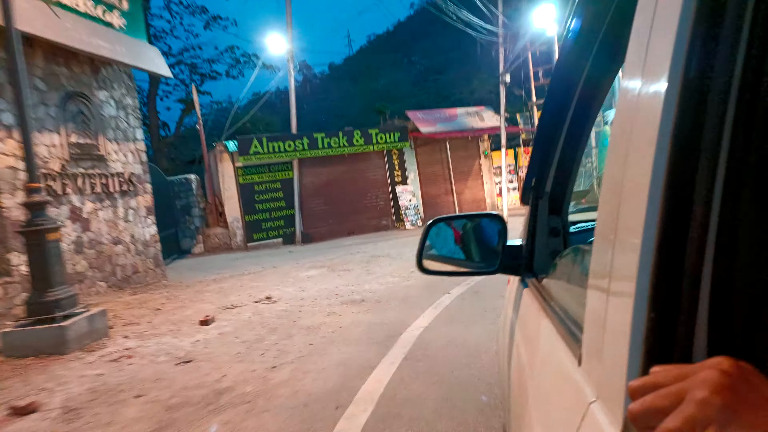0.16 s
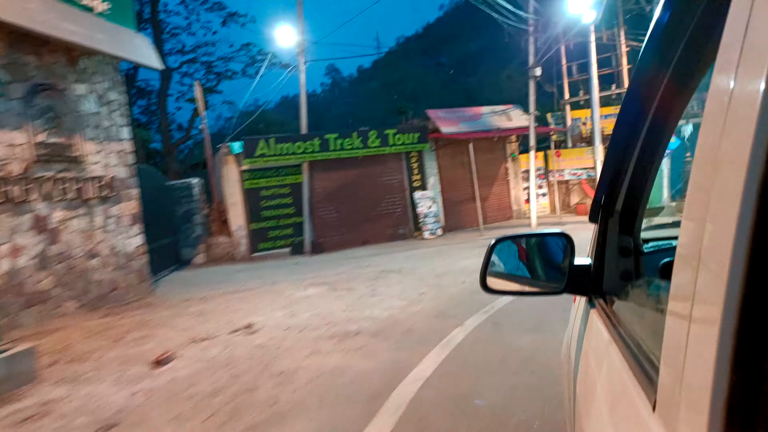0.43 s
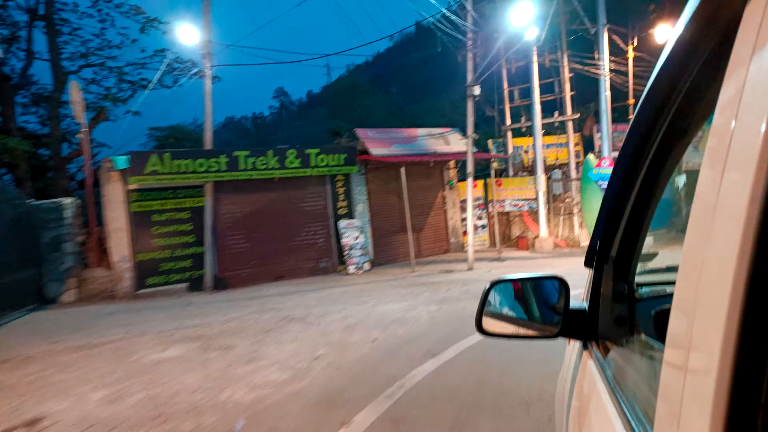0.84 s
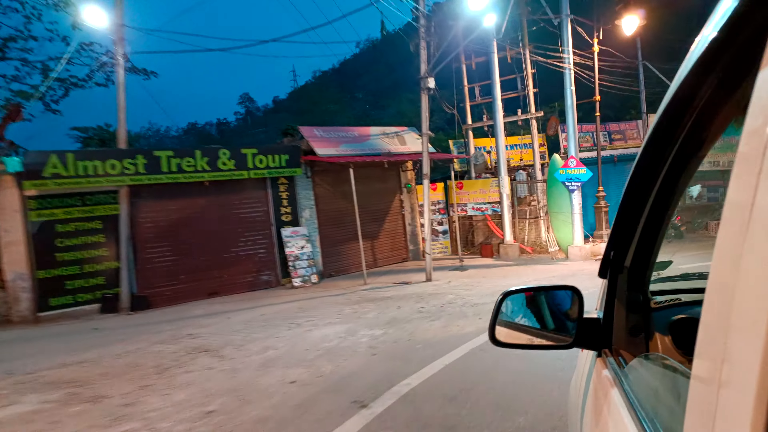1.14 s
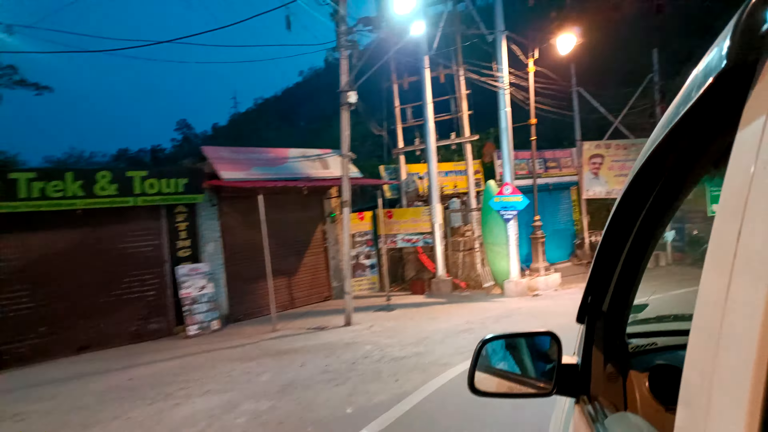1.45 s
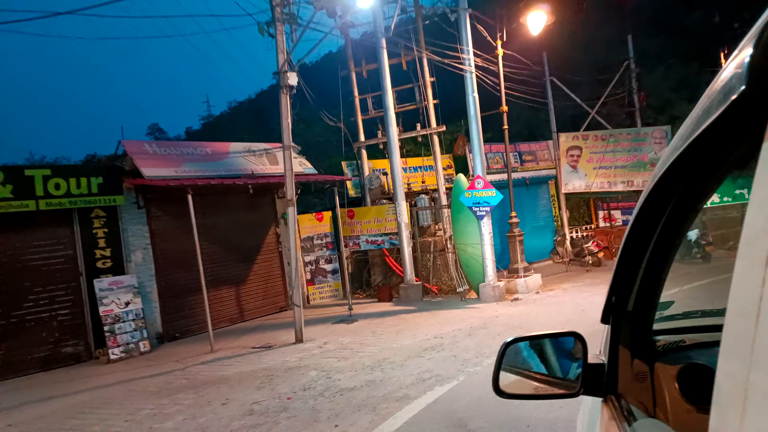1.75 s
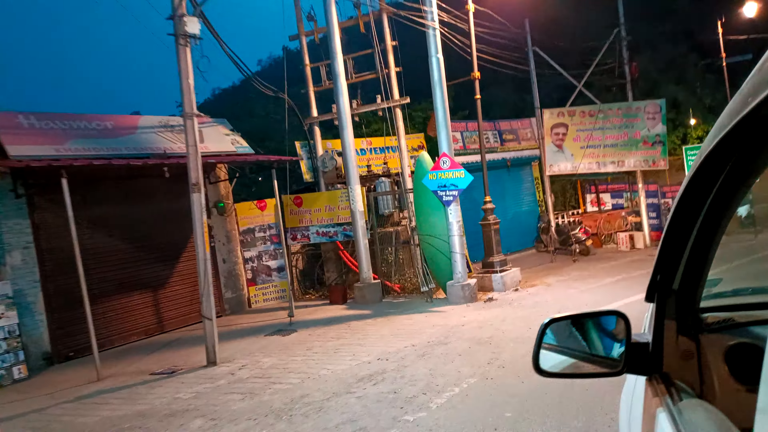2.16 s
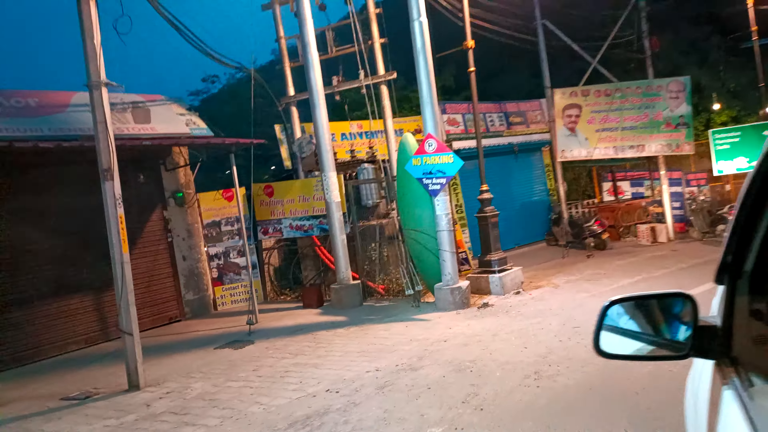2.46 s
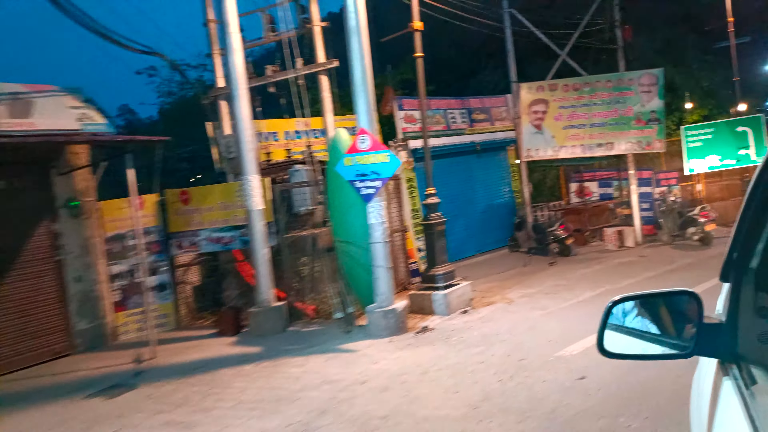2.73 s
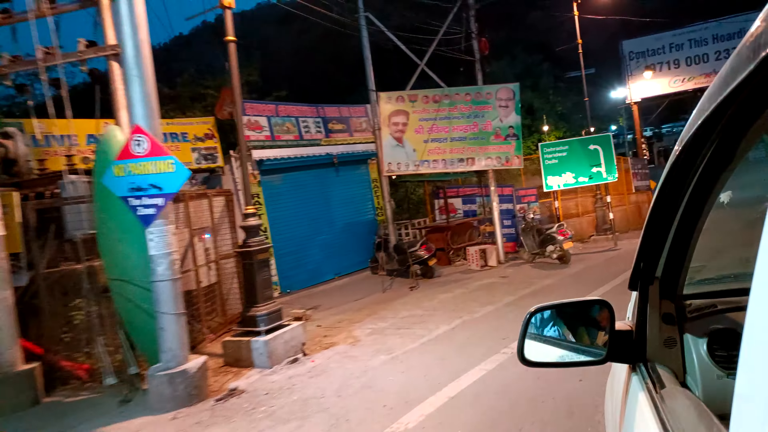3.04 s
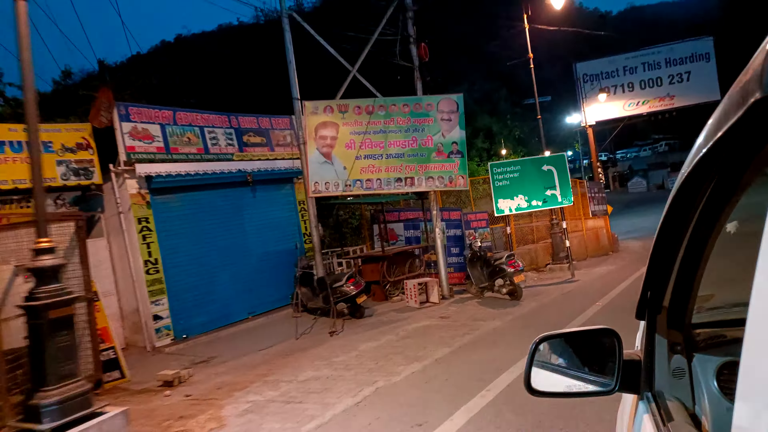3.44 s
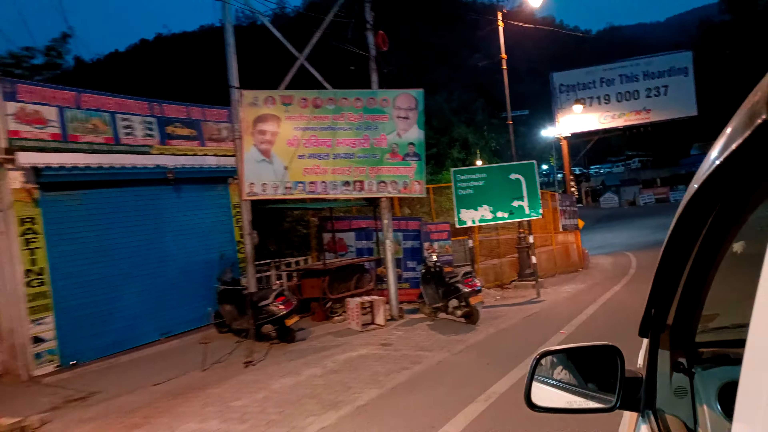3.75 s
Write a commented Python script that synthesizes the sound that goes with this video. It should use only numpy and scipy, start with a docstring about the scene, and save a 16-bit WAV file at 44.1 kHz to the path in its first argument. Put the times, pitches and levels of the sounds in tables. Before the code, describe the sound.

A car rolls slowly along a street, heard from a microphone at its open side window. The engine drones and knocks at low revs while tyres hiss and gusts of wind thump on the microphone, strongest on the left. About halfway through the engine eases and sinks towards idle, the wind turns louder, with choppy, crackling buffets, and a loose part ticks and rattles lightly on the right.

```python
"""Slow drive, window open

A street, heard from a phone held at the open side window of a slowly rolling car.
Close by, the engine drones and knocks at low revs and sags as the car slows, shaking a loose part.
Wind buffets the two microphone ports, the outer (left) one hardest, and drives the phone's limiter.
Behind it all, tyres and passing air hiss."""
import sys
import numpy as np
from scipy import signal
from scipy.fft import rfft, irfft
from scipy.io import wavfile
from scipy.ndimage import uniform_filter1d, minimum_filter1d, map_coordinates

SR = 44100
rng = np.random.default_rng(int(sys.argv[2]) if len(sys.argv) > 2 else 0)


def transcribe(signal):
    """Save signal, clipped to [-1, 1], as a 16-bit WAV file at the path in sys.argv[1]."""
    frames = np.atleast_2d(signal).T
    limited = np.clip(frames, -1, 1)
    pcm = np.round(limited * 32767).astype(np.int16)
    wavfile.write(sys.argv[1], SR, pcm)


N = 273420
T = np.arange(N) / SR

# engine speed: (time [s], firing rate [Hz])
FIRING_RATE = [(0.0, 30.35), (0.19, 30.9), (0.34, 31.8), (0.74, 30.99), (0.9, 32.75), (1.26, 32.02),
               (1.36, 32.94), (1.6, 32.32), (2.68, 35.64), (3.3, 27.42), (3.57, 26.91), (4.13, 26.81),
               (5.59, 23.42), (5.84, 22.59), (6.06, 22.83), (6.2, 21.4)]
# mean wind at the window: (time [s], rumble level [dB], tearing level [dB])
MEAN_WIND = [(0, -19, -34.5), (1.2, -23.5, -35), (2.8, -23, -34), (3.4, -13.5, -24.5), (4.1, -18, -23),
             (5.5, -15, -24), (5.8, -15.5, -27), (6.2, -13.5, -22.5)]


def engine(knock_s=0.026, left_db=-1, right_lag_s=0.0005):
    """Each firing thumps the exhaust and the cabin, knocks in the block and shakes a loose part."""
    # how hard the engine labours: (time [s], load [dB])
    effort = [(0, -1.5), (1.5, -3), (2.6, -3), (3.4, 1.5), (4.2, 3.5), (5, 5), (5.7, 0), (6.2, 0.5)]
    # resonances of exhaust and block: (frequency [Hz], gain [dB])
    exhaust_shape = [(8,-36),(30,-4.5),(68,0.5),(105,3),(135,-24),(165,6.5),(200,-8.5),(240,3),(290,-8.5),(370,0),(440,-4),(520,-15),(820,-29.5),(5000,-100)]
    block_shape = [(20,-48),(150,-26),(300,-19),(400,2.5),(510,-8.5),(650,-2),(830,-4.5),(1050,-17),(1350,-13.5),(1800,-26),(2600,-26.5),(4500,-43),(14000,-60)]
    hz, = curves(FIRING_RATE)
    load, = curves(effort)
    pace_db = 20 * np.log10(hz / 30)  # relative to cruising
    throttle_lift = arches([(2.93, 0.33, -18)])
    pulses, age, strength = firings(hz)
    exhaust = colour(pulses, exhaust_shape) * undb(-19 + 0.86 * load + throttle_lift)
    thud = cabin_resonances(body_echoes(exhaust + cabin(pulses, load, pace_db) + drone(pulses)))
    strikes = strength * np.exp(-age / knock_s) + gear_clatter(age, hz)
    # part of the knock reaches both ports directly, more is scattered by the road and walls
    direct = noise()
    knock = np.array([colour(strikes * (direct + 3.4 * noise()), block_shape) for _ in range(2)])
    knock *= undb(-29 + 3.4 * pace_db + 0.18 * load + throttle_lift)
    left, right = thud + knock + loose_ticks(age, hz)
    return np.array([left * undb(left_db), np.interp(T - right_lag_s, T, right)])


def firings(hz, scatter_db=1):
    """Four cylinders fire a little unevenly: pulses, seconds since the last one, and its strength."""
    # the cylinders in firing order: (strength [dB])
    cylinders = [0.037, 0.2, 0.17, -0.38]
    cycles = 0.3715 + np.cumsum(hz) / SR + 0.004 * walk(25)
    count = cycles.astype(int)
    strength = undb(np.take(cylinders, count, mode="wrap") + scatter_db * noise()[count])
    pulses = np.diff(count, prepend=count[0]) * strength
    return pulses, cycles % 1 / hz, strength


def cabin(pulses, load, pace_db, lag_s=0.0062, wobble_s=0.0003):
    """The cabin hums just after each firing, wavering, and booms lower down as the engine labours."""
    # the broad boom and the narrow hum: (frequency [Hz], gain [dB])
    boom_shape = [(8,-102),(50,-28.5),(76,-17),(100,7),(128,3),(160,4),(220,-15),(400,-47),(4000,-110)]
    hum_shape = [(8,-80),(110,-30.5),(148,0),(164,-2.5),(183,-13.5),(204,1),(220,-2.5),(240,-8),(262,-11.5),(295,-20),(4000,-110)]
    # moments when the hum seems to sink under the wind: (time [s])
    sinking_moments = [1.15, 1.38, 1.852, 2.13]
    late_pulses = np.interp(T - lag_s - wobble_s * walk(14), T, pulses, left=0)
    boom_db = -21 + 2.17 * load + 2 * walk(5.03)
    hum_db = -24 + 0.98 * load + 0.76 * pace_db + 3 * walk(8.8)
    hum_db += arches([(s, 0.15, -22) for s in sinking_moments])
    return colour(pulses, boom_shape) * undb(boom_db) + colour(late_pulses, hum_shape) * undb(hum_db)


def drone(pulses, waver_db=2):
    """Overtones of the firing ring in the car's body while the engine revs up."""
    # swell of the drone: (time [s], level [dB])
    swell = [(0, -48), (1.1, -53), (1.3, -31), (2.0, -27), (2.65, -30), (2.9, -27.5), (3.3, -42),
             (3.7, -49)]
    # body resonances: (frequency [Hz], gain [dB])
    body_shape = [(8, -67), (45, -21), (70, 3), (85, -11), (106, 3.5), (130, -28), (205, -28), (240, 2),
                  (264, -1), (295, -26), (370, -25.5), (430, 0), (495, -13), (560, -30), (655, -6),
                  (780, -25), (4000, -100)]
    level, = curves(swell)
    return colour(pulses, body_shape) * undb(level + waver_db * walk(5.13))


def body_echoes(thud, feedback=0.55, lead_s=0.0042):
    """Short echoes in the body smear each thud, which starts just before the block knocks."""
    for echo_s in (0.0019, 0.0033):
        allpass = np.r_[-feedback, np.zeros(int(echo_s * SR)), 1]
        thud = signal.lfilter(allpass, allpass[::-1], thud)
    return np.interp(T + lead_s, T, thud)


def cabin_resonances(thud, width_hz=22):
    """Single overtones of the firing stand out or sink for a moment in the cabin."""
    # narrow swells and dips: (crest time [s], length [s], frequency [Hz], gain [dB])
    overtones = [(2.35, 1.194, 207, 4.5), (3.9, 1.0, 160, 6), (4.256, .6, 127.9, -8.5),
                 (5.201, 1.07, 123, 5)]
    return thud + sum(resonate(thud, hz, width_hz) * (undb(arches([(s, length_s, db)])) - 1)
                      for s, length_s, hz, db in overtones)


def gear_clatter(age, hz, below_hz=23.3, gain_db=4, decay_s=0.003):
    """Force of the slack gears, which strike three times per firing as the engine nears idle."""
    # gear strikes: (position [share of the firing cycle], level [dB])
    strikes = [(.11, -12), (.45, -9), (.79, -6)]
    slack = (1 + np.tanh(2 * (below_hz - hz))) / 2
    return slack * sum(undb(db + gain_db) * np.exp(-((age * hz - share) % 1) / hz / decay_s)
                       for share, db in strikes)


def loose_ticks(age, hz, below_hz=26.8, range_hz=0.7, shake_s=0.0045, left_db=-7):
    """At low revs a loose part ticks unevenly with each firing, and once rattles hard."""
    # ring of the part: (frequency [Hz], gain [dB])
    part_shape = [(200,-31),(1800,-26),(2700,6.5),(3600,1),(4300,5.5),(4800,-4),(5400,2),(6150,0),(7300,-17),(14000,-18)]
    looseness = (1 + np.tanh((below_hz - hz) / range_hz)) / 2
    hard_rattle = arches([(4.993, 0.78, 6)])
    shake = (0.5 + age / shake_s * np.exp(1 - age / shake_s)) * undb(2 * walk(35))
    ticks = np.array([colour(shake * noise(), part_shape) for _ in range(2)])
    return ticks * looseness * undb(-42 + hard_rattle) * undb([[left_db], [0]])


def loose_clacks(gain_db=5, crack_s=0.0015, tail_s=0.013, tail_db=-11, click_db=-10, left_db=-10):
    """The loose part strikes, to the right: a dry click with a short ring, pitched anew each time."""
    # separate knocks: (time [s], level [dB], ring frequency [Hz])
    knocks = [(2.625, -26, 4500), (2.685, -31, 4990), (3.871, -32, 4170), (4.02, -27, 3580),
              (4.401, -32, 5040), (4.935, -27, 5234), (4.944, -29, 5564), (5.024, -23.5, 4420),
              (5.066, -26.5, 5045), (5.107, -28, 3960), (5.189, -23.5, 3930), (5.526, -29.5, 5940),
              (5.827, -31, 3504), (5.917, -31, 4243), (6.128, -30, 2500), (6.139, -31, 5824)]
    out, age = np.zeros((2, N)), T[:SR // 25]
    envelope = age / crack_s * np.exp(1 - age / crack_s) + undb(tail_db) * np.exp(-age / tail_s)
    for s, db, hz in knocks:
        burst = rng.standard_normal((2, len(age))) * envelope * undb(db + gain_db)
        clack = resonate(burst, hz, width_hz=1400) + undb(click_db) * burst
        start = int(s * SR)
        out[:, start:start + len(age)] += clack[:, :N - start]
    band = signal.butter(5, [2400, 6600], "bandpass", fs=SR, output="sos")
    return signal.sosfilt(band, out) * undb([[left_db], [0]])


def outer_wind(rumble_db=5.5, lull_db=-12, swirl_db=2, surge_db=3):
    """Eddies rumble right on the outer port; in a surge they sweep past faster, louder and brighter."""
    # gusts over the mean wind: (crest time [s], length [s], rumble gain [dB], tearing gain [dB])
    gusts = [(.46, 0.11, 2.1, 3.3), (.59, .26, 7.8, 14.2), (.875, .1, 8.6, 17), (1.05, 0.23, 4, 9.4),
             (1.31, 0.12, 3.8, 7.9), (1.459, 0.076, 3.8, 1.4), (1.572, .084, 5.7, 7.1), (1.9, .13, 3.5, 6),
             (2.23, 0.077, 4.2, 2.8), (2.43, 0.19, 8, 6.9), (2.59, 0.21, 5.2, 7), (2.909, .12, 7.6, 5.06),
             (3.25, 0.1191, 3.4, 3.77), (3.39, 0.093, 10, 1.86), (3.531, 0.13, 2.55, 4.1),
             (3.62, 0.096, 7, 2.03), (5.3, 0.094, 3.67, 1.9), (5.559, 0.16, 3.5, 2.62)]
    # the air briefly leaves the port: (time [s], length [s])
    lulls = [(2.135, .11), (2.825, .11), (3.013, 0.17), (3.311, 0.054), (3.437, 0.058), (3.553, 0.055),
             (3.688, 0.061), (3.857, 0.049), (4.084, 0.056), (4.496, 0.061), (4.625, 0.11), (4.779, 0.0954),
             (4.893, 0.037), (5.05, 0.086), (5.172, 0.04), (5.457, 0.064), (5.863, 0.058)]
    # spectra of large and small eddies: (frequency [Hz], level [dB])
    rumble_shape = [(8,-22),(30,-12),(65,-4.5),(120,-2),(200,-6),(320,-9),(500,-17),(900,-35.5),(2000,-62.5),(10000,-110)]
    tearing_shape = [(20,3),(100,-29),(200,-1.5),(350,-3.5),(560,-2),(760,-8.5),(1050,-20),(1600,-31.5),(3500,-73),(10000,-100)]
    rumble_level, tearing_level = curves(MEAN_WIND)
    calm = arches([(s, length_s, lull_db) for s, length_s in lulls])
    rumble_level += calm + arches([(s, length_s, db) for s, length_s, db, _ in gusts])
    tearing_level += calm + arches([(s, length_s, db) for s, length_s, _, db in gusts])
    rumble = colour(noise() * undb(swirl_db * walk(35)), rumble_shape)
    rumble *= undb(rumble_level + rumble_db + walk(16))
    surge = unit(walk(90) + walk(260))
    force = undb(tearing_level + surge_db * surge) + buffets()
    speed = (force / undb(-18)) ** 0.1 * undb(surge)
    return rumble + sweep_past(colour(noise(), tearing_shape), speed) * force


def buffets(gain_db=-1, flutter_db=2.2, rise_s=0.003003, fall_s=0.004, end_share=0.65):
    """Force of air slapping the outer port: it strikes abruptly, flutters as it holds, and drops away."""
    # surges of air: (start [s], length [s], level [dB])
    surges = [(2.879, 0.019, -9), (2.917, 0.0096, -9), (3.104, 0.037, -15.5), (3.225, 0.029, -11.5),
              (3.261, 0.04, -10.5), (3.376, 0.022, -13.5), (3.507, 0.041, -5.5), (3.581, 0.042, -12),
              (3.648, 0.023, -11), (3.716, 0.02, -8), (3.878, 0.038, -12), (3.93, 0.031, -12.5),
              (3.988, 0.021, -14.5), (4.02, 0.047, -9.5), (4.099, 0.046, -9), (4.17, 0.023, -8),
              (4.235, .02, -6.5), (4.267, 0.051, -9), (4.351, 0.048, -9), (4.413, 0.029, -6.5),
              (4.467, 0.015, -9.5), (4.522, 0.049, -7.5), (4.583, 0.012, -8.5), (4.663, 0.053, -10),
              (4.722, 0.027, -12), (4.809, 0.027, -7.5), (4.849, 0.033, -9), (4.908, 0.02, -10.5),
              (4.94, 0.02038, -7.5), (4.975, 0.055, -7.5), (5.086, 0.065, -10.5), (5.179, 0.018, -12),
              (5.222, 0.035, -13), (5.292, 0.031, -14.5), (5.332, 0.044, -10), (5.39, 0.033, -12.5),
              (5.482, 0.02, -12.5), (5.513, 0.068, -8), (5.616, 0.032, -15), (5.974, 0.019, -8.5),
              (6.022, 0.043, -15), (6.085, 0.046, -14), (6.158, 0.035, -4.5)]
    force = np.zeros(N)
    for s, length_s, db in surges:
        corners = [s, s + rise_s, s + length_s, s + length_s + fall_s]
        force += undb(db) * np.interp(T, corners, [0, 1, end_share, 0])
    return force * undb(gain_db + flutter_db * walk(120))


def rasps(crackle_db=10, steady_s=0.006):
    """Fast eddies cross the outer port: quick swells of crackling air, brighter the faster they pass."""
    # sharp eddies: (time [s], peak [dB], rise time [s], speed [ratio])
    eddies = [(2.888, -23, .002, 0.54), (3.11, -15, 0.0026, 0.69), (3.232, -18, .002, .9),
              (3.25, -12, 0.0015, 0.86), (3.518, -8, 0.003, 0.63), (3.534, -16, 0.0031, 0.64),
              (4.111, -11, 0.0023, 0.75), (4.14, 0, 0.0029, 0.73), (4.17, -9, 0.0022, 1.07),
              (4.18, -13, 0.0023, 1.23), (4.29, -13, 0.0029, 0.91), (4.312, -5, 0.0012, 1.15),
              (4.364, -5, 0.0014, 1.09), (4.427, -4.5, 0.0023, 0.9), (4.473, -14.5, .002, 0.95),
              (4.549, -3.5, 0.0017, 0.65), (4.558, -7, 0.0023, 0.85), (4.701, -15, 0.0017, 0.93),
              (4.712, -16.5, 0.0014, 0.91), (4.819, -8.5, 0.0019, 0.91), (4.833, -21, 0.0023, .85),
              (4.946, -9, 0.0018, 1.0), (4.977, -12, 0.0022, 0.91), (5.002, -3, 0.0025, .9),
              (5.095, -20, 0.0018, 1), (5.107, -11, .0015, .9), (5.116, -10, 0.0016, 0.79),
              (5.257, -14.5, 0.002, 1.21), (5.334, -16, 0.0022, 0.83), (5.353, -15, 0.0021, 1.12),
              (5.364, -6, 0.0019, 0.96), (5.54, -12.5, 0.0015, 0.91), (5.555, -7, 0.0034, 1.38),
              (6.092, -17, 0.0016, 0.79), (6.131, -11, 0.0022, 0.92)]
    # their spectrum at speed 1: (frequency [Hz], level [dB])
    rasp_shape = [(20,-18),(250,-23),(700,11.5),(1400,-1.5),(1900,-4),(2800,-3.5),(4100,-25),(6000,-36),(15000,-49)]
    speed, = curves([(s, pace) for s, _, _, pace in eddies])
    crackle = colour(noise() * undb(crackle_db * walk(500)), rasp_shape)
    air = sweep_past(crackle, speed)
    running_rms = np.sqrt(uniform_filter1d(air ** 2, int(steady_s * SR)) + 1e-9)
    return air / running_rms * swells([row[:3] for row in eddies])


def thumps(gain_db=-3, wander=0.35):
    """Each slow eddy pushes and pulls on one port for a few uneven cycles."""
    # slow eddies: (crest time [s], level [dB], length [s], pitch [Hz], port [0 outer, 1 sheltered])
    eddies = [(0.062, -10, 0.038, 125, 1), (0.147, -6, 0.027, 126, 1), (0.179, 1, 0.046, 136, 0),
              (0.319, -1.5, 0.026, 148, 0), (0.412, -5, 0.033, 102, 1), (0.428, -1.5, 0.049, 131, 0),
              (0.475, 1, 0.017, 106, 0), (0.527, -8, 0.028, 97, 0), (0.858, -2, 0.035, 123, 0),
              (0.915, -6, 0.018, 97, 1), (0.947, -3, 0.03, 114, 0), (0.977, -8, 0.025, 113, 1),
              (1.016, -2, 0.055, 165, 0), (1.082, -5.5, 0.039, 111, 0), (1.315, -1, 0.021, 129, 0),
              (1.447, -6, 0.049, 115, 1), (1.545, -3, 0.033, 170, 0), (2.056, -8, 0.024, 122, 0),
              (2.42, -6, 0.05, 94, 0), (2.624, -6, 0.048, 104, 0), (2.895, -3.5, 0.048, 109, 0),
              (2.932, -1, 0.05, 118, 0), (3.14, -7, 0.039, 128, 0), (3.254, -7, 0.061, 95, 0),
              (3.349, -17, 0.055, 121, 1), (4.23, -17, 0.075, 105, 1), (4.375, -8, 0.049, 123, 1),
              (4.458, -11, 0.075, 81, 1), (5.375, -11, 0.063, 88, 1), (5.576, -7, 0.069, 148, 1),
              (5.634, -6, 0.051, 134, 1), (6.103, -2, 0.041, 104, 1)]
    out = np.zeros((2, N))
    uneven_time = np.cumsum(np.exp(wander * walk(170) - wander ** 2)) / SR
    for s, db, length_s, hz, port in eddies:
        near = np.abs(T - s) < 2 * length_s
        envelope = undb(db + gain_db) * np.exp(-(2 * (T[near] - s) / length_s) ** 2)
        out[int(port), near] += envelope * np.sin(2 * np.pi * hz * uneven_time[near])
    return out


def sheltered_wind(shelter_db=-6, flutter_db=2):
    """The sheltered port catches only a weak share of the wind, with dull puffs and a few slaps."""
    # puffs over the mean wind: (crest time [s], length [s], gain [dB])
    puffs = [(.08, 0.089, 15.5), (.42, 0.13, 11), (.93, .19, 15), (1.5, 0.32, 12.5), (2.06, .12, 9.5),
             (2.63, 0.17, 16), (4.98, 0.094, 15), (5.62, .2, 10), (5.8, .1, 8), (6.1, .15, 8)]
    # slaps of air: (time [s], peak [dB], rise time [s])
    slaps = [(5.245, -18, .004), (5.585, -6, .003), (5.632, -9, 0.0053), (5.81, -12.5, .0025)]
    # their spectra: (frequency [Hz], level [dB])
    puff_shape = [(8,-14),(25,-10.5),(80,-3.5),(140,-7),(250,-15.5),(450,-23),(1000,-45),(10000,-110)]
    slap_shape = [(20, -26), (150, -8), (330, 0), (600, -11), (1000, -25), (1600, -29), (3000, -43),
                  (10000, -86)]
    level, _ = curves(MEAN_WIND)
    level += shelter_db + arches(puffs) + flutter_db * walk(10)
    return colour(noise(), puff_shape) * undb(level) + colour(noise(), slap_shape) * swells(slaps)


def road_hiss(left_db=12, right_db=13.5, grit_db=2, flicker_db=0.72):
    """Below the window, tyres hiss over a gritty surface; each port colours the hiss in its own way."""
    # tyres and passing air, fading as the car slows: (time [s], level [dB])
    hiss_level = [(0.0, -37.5), (1.05, -37.5), (2.19, -35), (2.54, -36.5), (3.2, -37.5), (3.75, -39.5),
                  (4.68, -41.5), (5.05, -40), (5.65, -41.5), (6.2, -41.5)]
    # the hiss at each port: (frequency [Hz], level [dB])
    left_shape = [(40,19.5),(200,10),(600,8.5),(1100,1.5),(1800,-5),(2300,-1),(3000,-8.5),(4000,-11),(6500,-22.5),(7600,-19.5),(10000,-23),(12500,-28),(15500,-50)]
    right_shape = [(40,8.5),(200,9.5),(600,3.5),(1100,-4.5),(1800,-6),(2300,-1),(3000,-6),(4600,-15.5),(6200,-16),(7100,-26.5),(8000,-44),(9000,-32),(14000,-30.5),(15700,-33)]
    level, = curves(hiss_level)
    swell = undb(level + flicker_db * walk(17))
    ports = [colour(noise() * undb(grit_db * walk(900)), shape) for shape in (left_shape, right_shape)]
    return np.array(ports) * swell * undb([[left_db], [right_db]])


def tyre_rush(crest_s=1.08, spread_s=0.87, peak_db=-31.5, left_db=-4):
    """A rush of tyre noise swells and fades as the car rounds a bend."""
    # spectrum of the rush: (frequency [Hz], level [dB])
    rush_shape = [(200, -28), (1200, -19), (2000, 5), (2900, 3), (3400, -5), (4500, -18), (7000, -32),
                  (15000, -59)]
    swell = undb(peak_db) * np.exp(-((T - crest_s) / spread_s) ** 2)
    return np.array([colour(noise(), rush_shape) for _ in range(2)]) * swell * undb([[left_db], [0]])


def sweep_past(eddies, speed):
    """Carry a frozen field of eddies over a port; its frequencies scale with the speed."""
    return map_coordinates(eddies, [np.cumsum(speed)], order=3, mode="mirror")


def colour(x, response, size=8192):
    """Ring x through a causal body with a response of (frequency [Hz], gain [dB]); rms 1."""
    hz, db = np.transpose(response)
    bin_hz = np.arange(size // 2 + 1) * SR / size
    log_gain = np.log(undb(np.interp(np.log(bin_hz + 1), np.log(hz), db)))
    cepstrum = irfft(log_gain)[:size // 2]
    cepstrum[1:] *= 2  # minimum phase
    impulse_response = irfft(np.exp(rfft(cepstrum, size)))
    return unit(signal.fftconvolve(x, impulse_response)[:N])


def resonate(x, hz, width_hz):
    """Pass x through a single resonance."""
    return signal.lfilter(*signal.iirpeak(hz, hz / width_hz, fs=SR), x)


def swells(rows):
    """Envelope of short bursts from rows (time [s], peak [dB], rise time [s])."""
    envelope = np.zeros(N)
    for s, db, rise_s in rows:
        start = int(s * SR)
        age = T[:min(SR // 10, N - start)] / rise_s
        envelope[start:start + len(age)] += undb(db) * age ** 2 * np.exp(2 - 2 * age)
    return envelope


def arches(rows):
    """Smooth rises and falls in dB from rows (crest time [s], length [s], gain [dB])."""
    return sum(db * np.cos(np.pi * np.clip((T - s) / length_s, -.5, .5)) ** 2 for s, length_s, db in rows)


def curves(table):
    """Each column after the first, joined by straight lines in time."""
    s, *columns = np.transpose(table)
    return [np.interp(T, s, column) for column in columns]


def walk(rate):
    """Smooth random drift that changes about rate times a second; rms 1."""
    steps = np.interp(T * rate, np.arange(N), noise())
    return unit(uniform_filter1d(steps, int(SR / rate / 2)))


def noise():
    """White noise."""
    return rng.standard_normal(N)


def unit(x):
    """Scale to rms 1."""
    return x / np.sqrt(np.mean(x ** 2))


def undb(db):
    """Decibels to gain."""
    return 10 ** (np.asarray(db) / 20)


def limit(x, ceiling=0.89, hold_s=0.008):
    """Look-ahead limiter: the gain dips smoothly round each peak that would pass the ceiling."""
    span = int(hold_s * SR)
    gain = np.minimum(1, ceiling / (np.abs(x) + 1e-9))
    return x * uniform_filter1d(minimum_filter1d(gain, span), span)


def scene():
    """At the open window, engine, rattle and road reach both ports; each port has its own wind."""
    car = engine() + loose_clacks() + road_hiss() + tyre_rush()
    wind = thumps() + np.array([outer_wind() + rasps(), sheltered_wind()])
    return car + wind


def record(dry):
    """The phone cuts the deepest rumble, limits each channel on its own and cuts the top."""
    low_cut = signal.butter(4, 20, "highpass", fs=SR, output="sos")
    top_cut = signal.ellip(10, 0.2, 80, 15700, fs=SR, output="sos")
    return signal.sosfilt(top_cut, limit(signal.sosfilt(low_cut, dry)))


dry = scene()
out = record(dry)
transcribe(out)
```